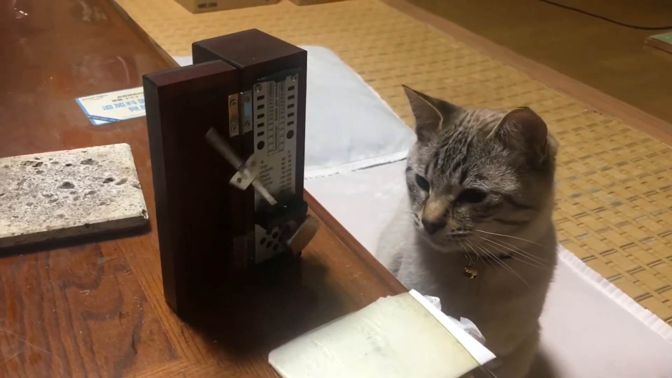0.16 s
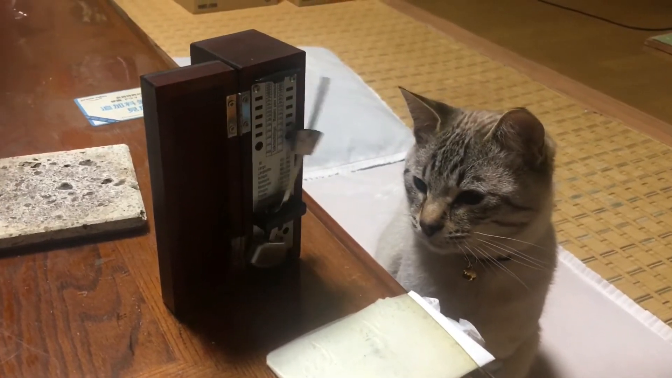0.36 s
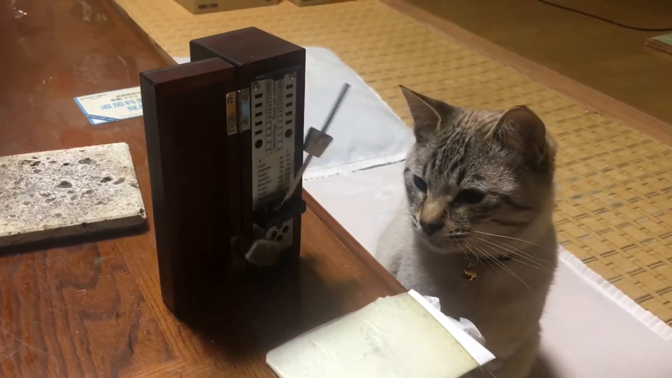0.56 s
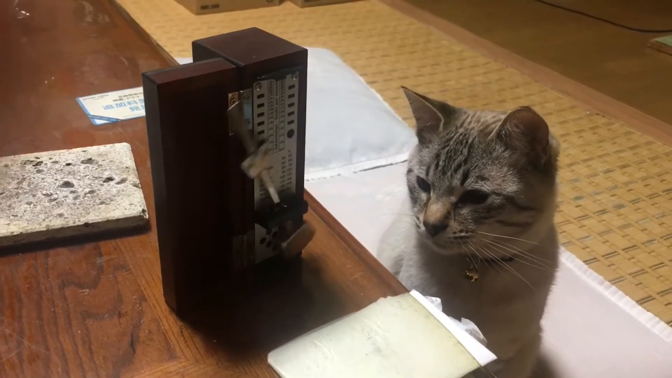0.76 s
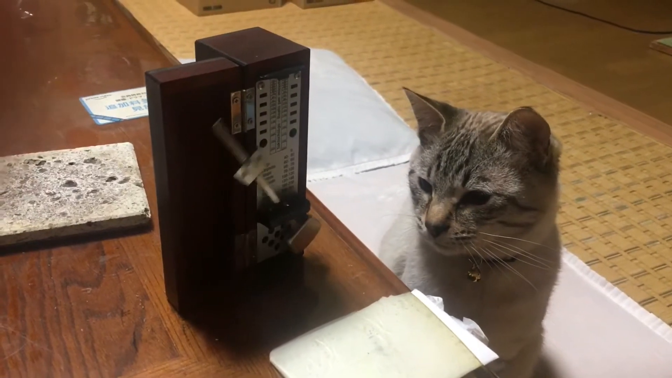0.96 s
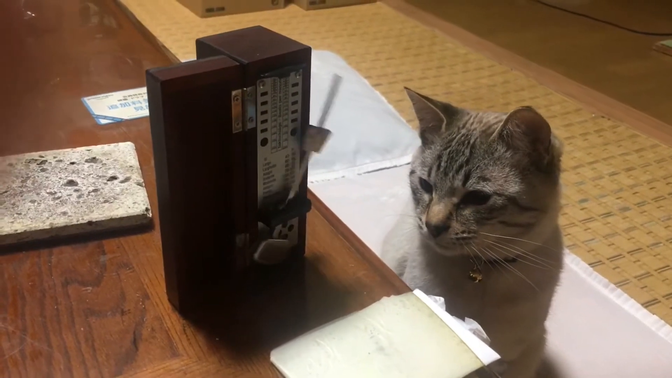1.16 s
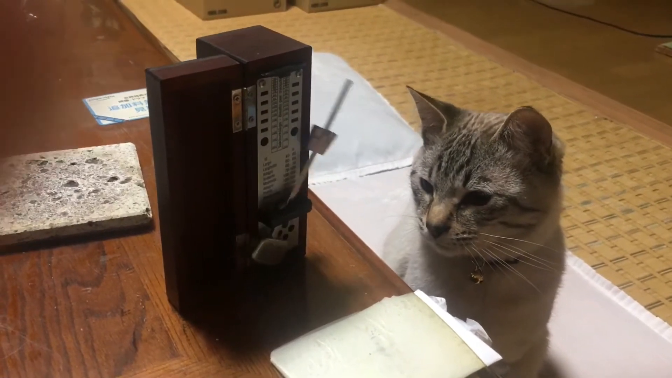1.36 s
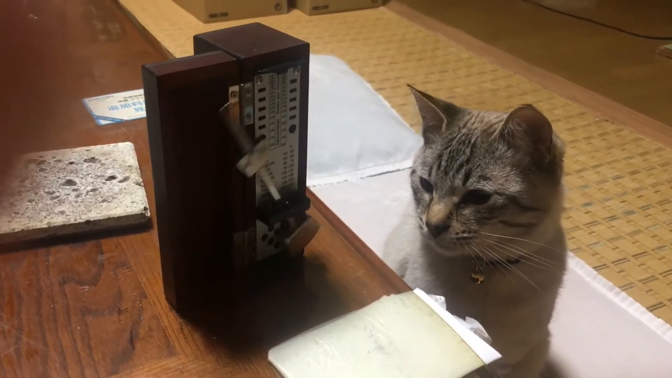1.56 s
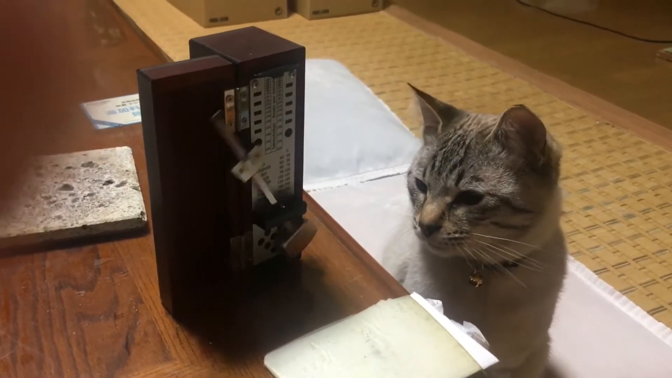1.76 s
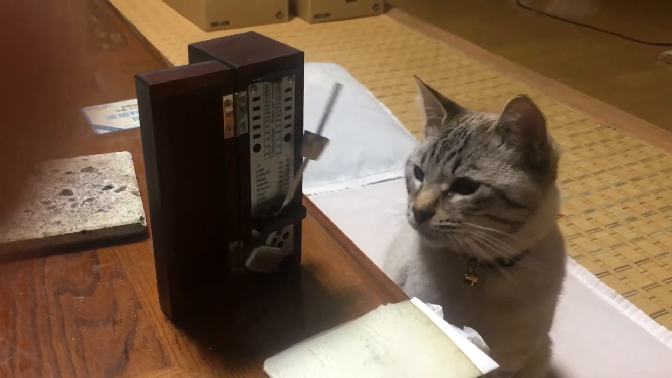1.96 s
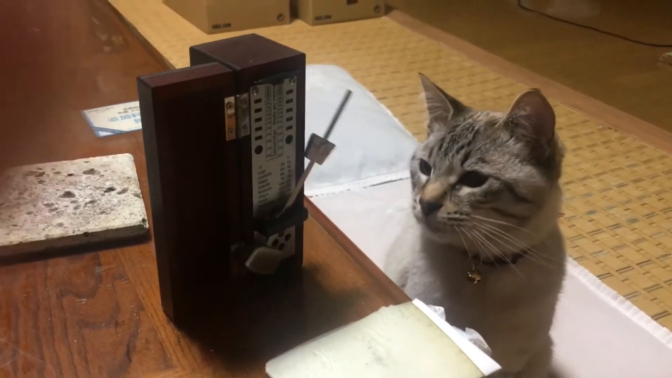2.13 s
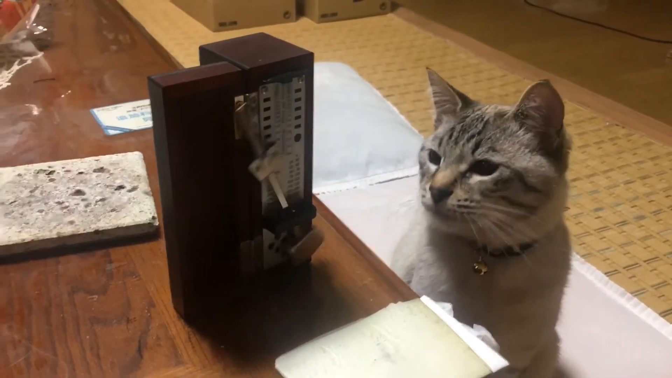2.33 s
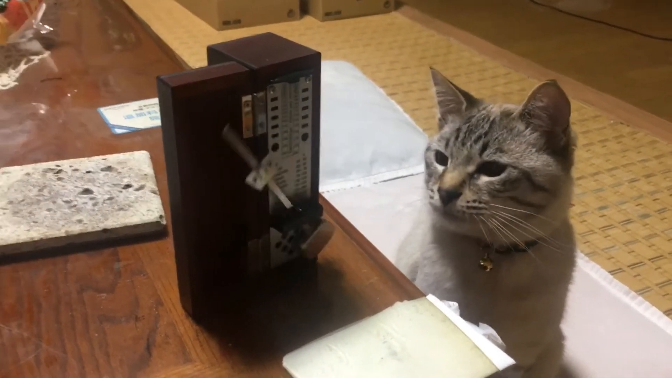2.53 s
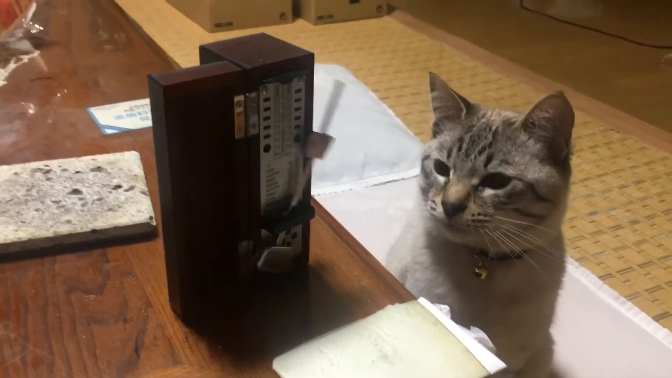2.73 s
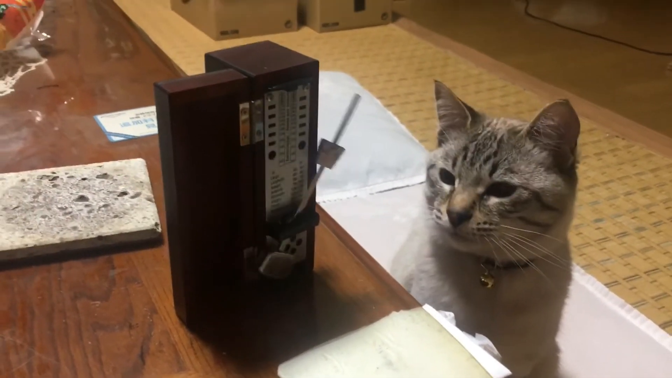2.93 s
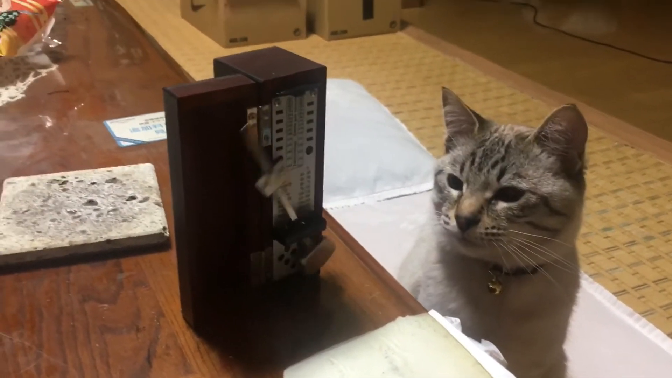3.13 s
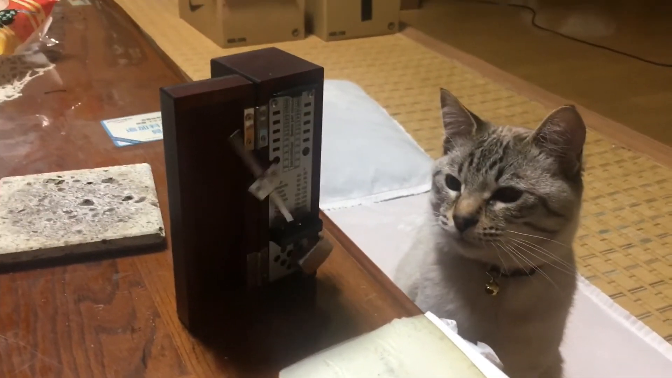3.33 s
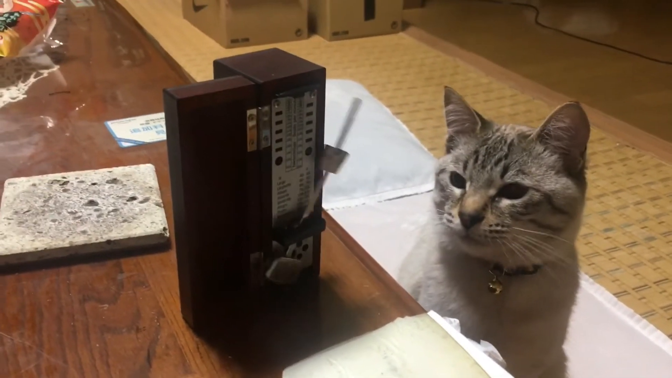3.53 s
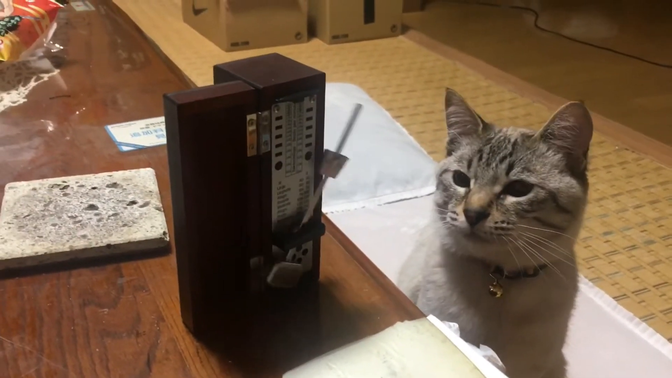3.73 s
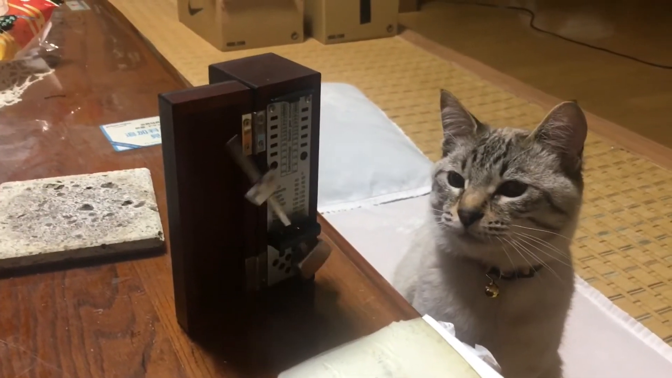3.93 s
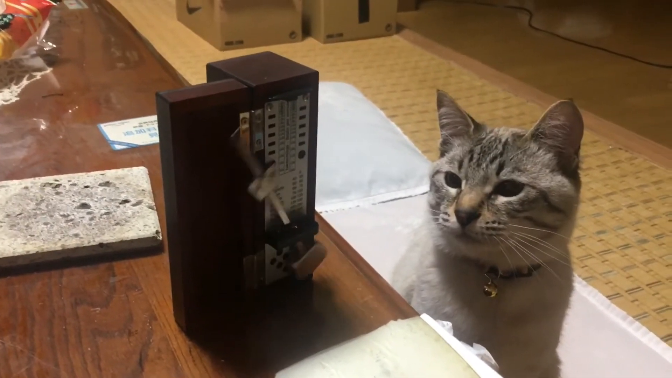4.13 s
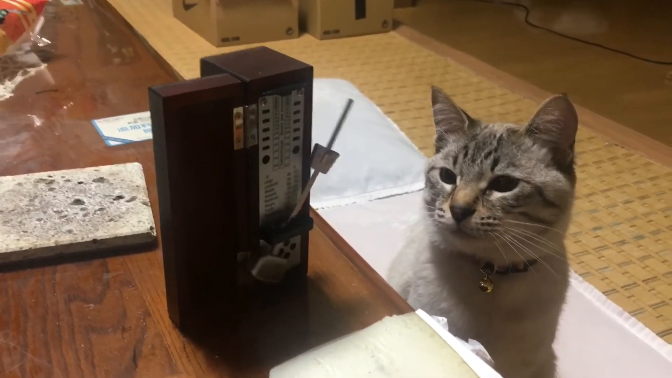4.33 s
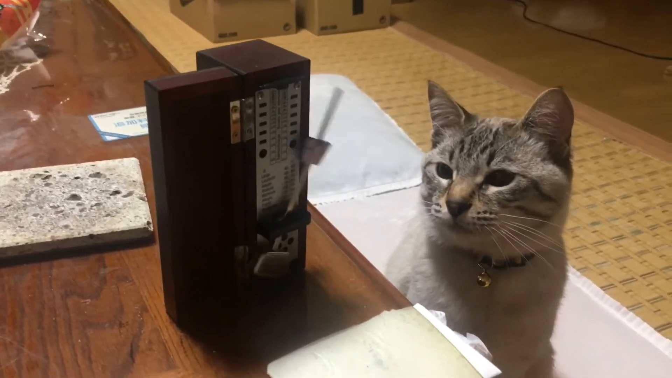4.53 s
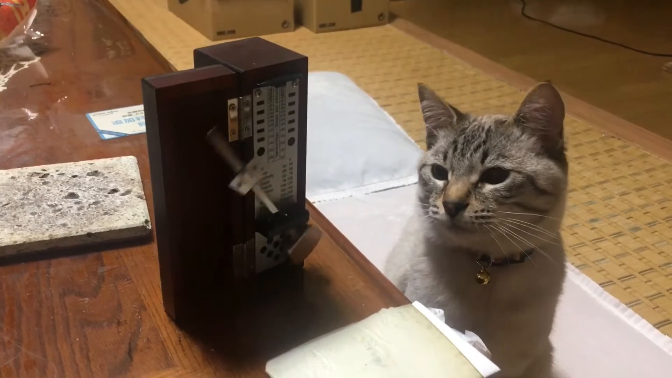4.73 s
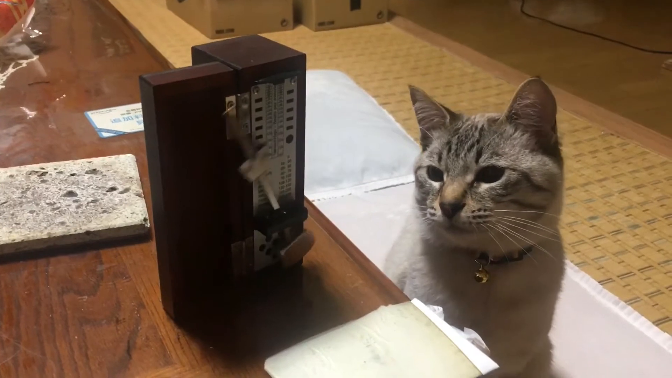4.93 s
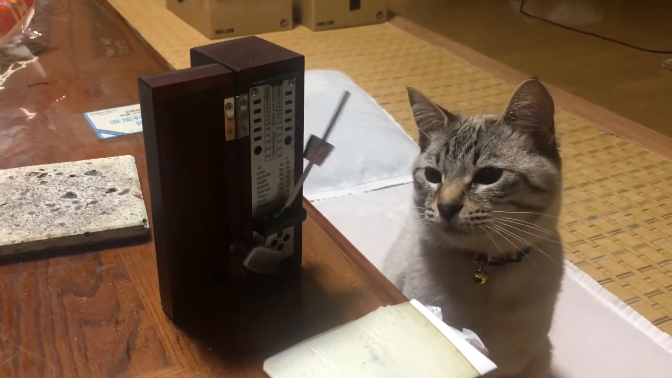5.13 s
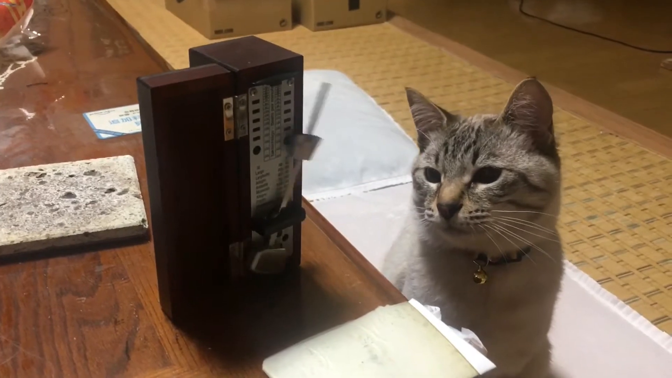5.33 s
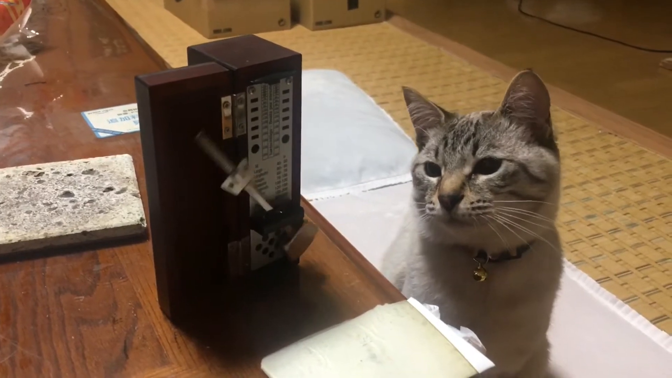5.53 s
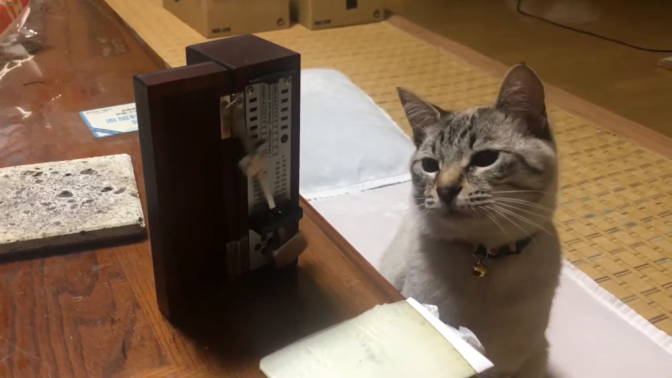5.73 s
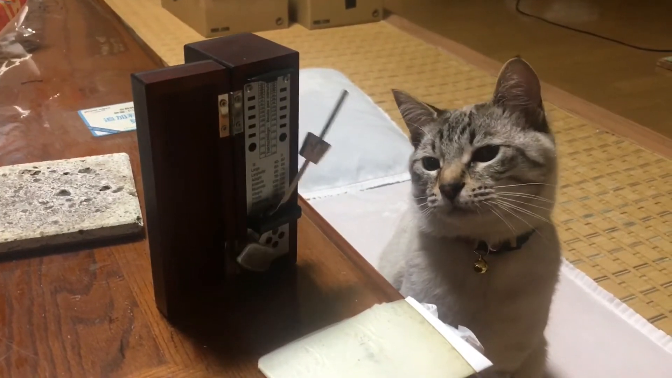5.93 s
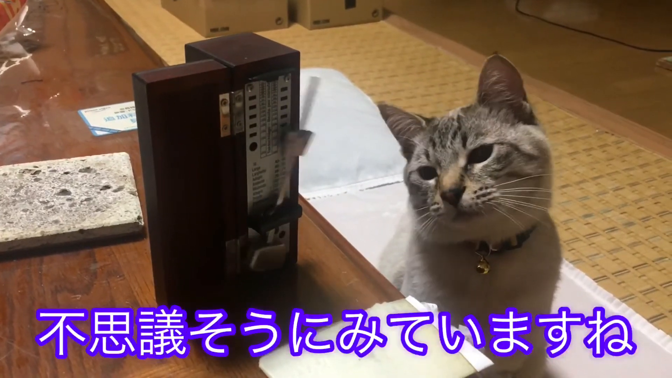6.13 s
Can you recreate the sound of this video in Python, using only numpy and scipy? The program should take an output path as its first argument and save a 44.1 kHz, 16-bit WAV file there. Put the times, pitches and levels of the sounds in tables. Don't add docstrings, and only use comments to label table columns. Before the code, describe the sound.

A wooden pendulum metronome ticks steadily about every 0.4 seconds in a quiet room, with one soft deep thump near the middle.

```python
import sys
import numpy as np
from scipy import signal
from scipy.fft import rfft, irfft, next_fast_len
from scipy.io import wavfile
from scipy.ndimage import uniform_filter1d, map_coordinates

SR = 44100
rng = np.random.default_rng(int(sys.argv[2]) if len(sys.argv) > 2 else 0)


def boost_factor(decibels):
    exponent = np.asarray(decibels, float) / 20
    return 10 ** exponent


def pcm_store(signal):
    levels = np.round(np.clip(np.atleast_2d(signal), -1, 1) * 32767)
    wavfile.write(sys.argv[1], SR, levels.astype(np.int16).T)


N = 272538

# t/s, level/dB
TICKS = [(-.085, -1.5), (.3072, 0), (.6964, -0.5), (1.0931, 0), (1.4821, 0), (1.8778, 0), (2.2682, 0),
         (2.6641, 0), (3.0557, 0.5), (3.448, 0.5), (3.8404, 0), (4.2345, -0.5), (4.627, 0.5), (5.0192, 0.5),
         (5.4133, 0), (5.8056, 0)]
# side panel level/dB, front panel level/dB, hollow level/dB, spring level/dB
TOOTH_KINDS = [
    (-8, -6, 4.5, -8),
    (-13.5, 1, 4.5, -6),
    (2.5, -7, 1.5, -12),
    (-8.5, 1, 5.5, -7),
]
# f/Hz, level/dB, t60/s, sense of motion (signed)
CASE = [(1046, -18.5, 0.0079, -0.9), (1167, -28.5, 0.067, 0.39), (1524, -7.5, 0.0067, 0.9),
        (1969, -6.5, 0.012, 0.98), (1991, -19.5, 0.033, -0.72), (2234, -8, 0.0027, -1.18),
        (2878, -17.5, 0.011, -1.04), (3150, -24, 0.014, 0.95), (3455, -9.5, 0.015, -1.06),
        (3686, -25.5, .03, 0.89), (4345, -12.5, .004, -0.89), (4624, -28.5, 0.036, -0.69),
        (5178, -23.5, 0.014, 0.78), (5133, -29, 0.024, 0.96), (6376, -21.5, 0.019, -0.81),
        (6796, -22, 0.0036, -1.1), (7960, -25.5, 0.018, -0.68)]
# f/Hz, level/dB
CRACK = [(2000, -30.5), (4500, -11.5), (6500, -15), (8500, 3), (10000, -1), (13000, -5.5), (15000, -9)]
# f/Hz, level/dB, t60/s, sense of motion (signed)
FRONT_PANEL = [(1375, -24, .018, -0.52), (1480, -16, .015, -0.48), (1540, -19, 0.022, -0.34)]
# f/Hz, level/dB, t60/s, sense of motion (signed)
REBOUND = [(1910, -16, 0.0092, 1), (4690, -23, 0.0098, 0.99), (10380, -30, 0.0034, 0.89)]
# f/Hz, level/dB, t60/s, sense of motion (signed)
SIDE_PANEL = [
    (760, -23.5, 0.078, 0.65),
    (765, -49, .25, 0.95),
]
# f/Hz, level/dB, t60/s, sense of motion (signed)
HOLLOW = [(571.6, -35, 0.026, 0.73), (620.5, -32.5, 0.055, -0.45)]
# f/Hz, level/dB, t60/s, sense of motion (signed)
ROD = [(1505, -52, 0.2, 0.18), (3234, -46.5, 0.32, 0.39), (3360, -35, 0.054, 0.69),
       (3560, -38.5, 0.22, -0.49), (3700, -65, 0.14, -0.32), (4400, -46, 0.21, 0.89),
       (5370, -48.5, 0.26, -1), (5900, -50, 0.19, 0.69), (6210, -52, .2, 0.78)]
# f/Hz, level/dB, t60/s, sense of motion (signed)
SPRING = [(1915, -47, .2, 1), (1985, -51, .16, 1)]
# f/Hz, level/dB, t60/s, sense of motion (signed)
TABLE_TOP = [(237.2, -32.5, 0.078, 0.93), (300, -36, 0.074, -1.2)]
# t/s, level/dB
BOUNCES = [(.0035, -22), (.0048, -15.5), (0.0225, -24.5)]
# t/s, level/dB
WALLS = [(.0088, 4.5), (.0118, 1), (0.0161, 4.5)]
# f/Hz, width/Hz, level/dB
PANELS = [(1076, 34, -10), (1460, 190, -9), (2020, 110, -11), (2430, 15, -17), (2865, 93, -14),
          (3427, 120, 0), (4320, 140, -9), (4600, 31, -11), (5440, 35, -13), (5650, 15, -15),
          (5940, 28, -14), (6200, 40, -15), (6920, 37, -24), (7310, 32, -25)]
# f/Hz, level/dB
SCATTER = [(410, -22), (700, -9.5), (841, -8), (1400, 4), (1950, -9.5), (2490, -21), (3460, -5.5),
           (3940, -27), (4380, -8.5), (5760, -9.5), (6320, -6.5), (7290, -26), (9110, -16.5),
           (10700, -31.5), (12500, -34), (16000, -47.5)]
# f/Hz, t60/s
NOOK = [(500, 0.01), (3000, 0.056), (10000, .04)]
# f/Hz, level/dB
DIFFUSE = [(240, -47), (400, -17), (626, -5.5), (780, -19.5), (964, -15.5), (1110, -11.5), (1500, -13),
           (1900, -16.5), (2320, -21), (2930, -17), (3470, -3), (3930, -13.5), (6340, -20), (7510, -27.5),
           (12100, -35.5), (16000, -56)]
# f/Hz, t60/s
ROOM = [(200, 0.21), (700, 0.23), (2000, 0.21), (3500, 0.26), (6000, 0.26), (10000, 0.25), (16000, 0.18)]
# t/s, how far round (0-1)
LISTENER = [
    (1.9, 0.06),
    (3.05, 0.8),
    (3.85, 0.62),
    (5.8, 0.68),
]
# f/Hz, level/dB
ROUND = [(2200, -2), (2850, -8), (3500, -4), (4100, -1.5), (5150, 10), (5900, 3.5), (7000, -6.5)]
# t/s, level/dB, f/Hz, t60/s, upper mode ratio, upper mode level/dB
THUMPS = [
    (2.513, -45, 270, 0.025, 2.6, -16),
    (2.82, -28.5, 62, 0.074, 2.1, -3),
]
# t/s, level/dB, f/Hz, t60/s, upper mode ratio, upper mode level/dB
CLICK = (.857, -49, 1900, .03, 1.15, 3)
# f/Hz, level/dB per Hz
HUM = [(18, -28), (30, -8), (81, 3), (144, -2), (199, 1), (240, -5), (284, 1.5), (347, -9.5), (524, -10.5),
       (640, -17.5), (697, -15), (781, -31.5), (900, -22), (1170, -50.5), (1980, -120)]
# t/s, half-width/s, level/dB
SWELLS = [
    (.55, 0.46, 1),
    (2.4, .55, 2),
    (4.6, 0.47, 2),
]
# f/Hz, level/dB per Hz
HISS = [(350, -27.5), (600, -10.5), (781, -8.5), (1520, -12.5), (1950, -12), (2340, -16), (2650, -13.5),
        (3740, -17.5), (4070, -13.5), (4940, -23), (5520, -20.5), (7700, -24), (12200, -24.5),
        (15400, -30.5), (16500, -38)]
# f/Hz, width/Hz, level/dB
WHINE = [(4060, 49, -79.5), (5640, 60, -85.5), (6100, 130, -86.5), (48.7, 7.4, -61), (198, 9.2, -67.5)]
# f/Hz, width/Hz, level/dB, start t/s, end t/s
PASSING = [
    (10800, 250, -85, 3.9, 4.9),
    (497, 20, -62, 5.14, 5.3),
    (497, 20, -63, 5.54, 5.74),
    (497, 20, -65, .58, .7),
]

FRONT_LATE_S = 0.0024
REBOUND_S = 0.0036
SPRING_LATE_S = 0.045
HUM_DB, HISS_DB = -54.5, -67.5
HISS_FOLLOWS = 0.41
FAN_ON_S, FAN_RISE_S, FAN_DB = 3.85, 0.081, 1.5
MIC_TOP_HZ, MIC_LOW_HZ, BAND_LIMIT_HZ = 15600, 42, 16860


def unit(x):
    return x / np.sqrt(np.mean(x ** 2) + 1e-20)


def along(points, hz):
    f, v = np.transpose(points)
    return np.interp(np.log(hz + 1), np.log(f + 1), v)


def noise(gain, n=N):
    m = next_fast_len(n + 8192)
    spectrum = rfft(rng.standard_normal(m))
    return unit(irfft(spectrum * gain(np.fft.rfftfreq(m, 1 / SR)), m)[:n])


def coloured(colour, n=N):
    return noise(lambda f: boost_factor(along(colour, f)), n)


def later(x, s):
    return np.pad(x, (round(abs(s) * SR), 0))[:len(x)]


def echoes(x, taps):
    return sum(boost_factor(db) * later(x, s) for s, db in taps)


def add(out, x, s):
    out[round((s + 1) * SR):][:len(x)] += x


def ring(modes, t, scatter_db=0.0, attack=0.00039):
    out = 0
    for hz, db, t60, sense in modes:
        level = boost_factor(db + scatter_db * rng.standard_normal() - 60 * t / t60)
        out = out + sense * level * np.sin(2 * np.pi * hz * t)
    return out * (1 - np.exp(-t / attack))


def metronome():
    out, t = np.zeros(N + 2 * SR), np.arange(SR // 3) / SR
    places = [room_answer(t), room_answer(t)]
    tooth = coloured(CRACK, len(t))
    for k, (s, db) in enumerate(TICKS):
        moved = np.interp(s, *np.transpose(LISTENER))
        side_db, front_db, hollow_db, spring_db = TOOTH_KINDS[k % len(TOOTH_KINDS)]
        blow = escapement_blow(t, tooth, moved, front_db)
        low = low_body(t, hollow_db)
        side = boost_factor(side_db) * ring(SIDE_PANEL, t, attack=0.012)
        near = echoes(blow, BOUNCES)
        steel = rod_and_spring(t, spring_db)
        turn = 0.17 * s
        room = np.cos(turn) * places[0] + np.sin(turn) * places[1] + 0.35 * room_answer(t)
        add(out, boost_factor(db) * (blow + low + side + near + room + steel), s)
        slip = ring(CASE, t, scatter_db=3, attack=0.002)
        add(out, boost_factor(db - 48) * slip, s - 0.021)
    return out[SR:SR + N]


def escapement_blow(t, tooth, moved, front_db):
    heard = [(hz, db + (moved - 0.25) * along(ROUND, hz), t60, sense) for hz, db, t60, sense in CASE]
    case = ring(heard, t, scatter_db=1.1)
    front = later(ring(FRONT_PANEL, t, scatter_db=-0.9, attack=0.0014), FRONT_LATE_S)
    crack_level = boost_factor(-29.0 + 0.9 * moved - 60 * t / 0.01)
    crack = crack_level * (tooth + 0.5 * coloured(CRACK, len(t)))
    rebound = later(ring(REBOUND, t, scatter_db=1.6, attack=0.0007), REBOUND_S)
    return case + boost_factor(front_db) * front + crack + boost_factor(0.3 * front_db) * rebound


def low_body(t, hollow_db):
    hollow = boost_factor(hollow_db) * ring(HOLLOW, t, scatter_db=-0.66, attack=0.001)
    table = later(ring(TABLE_TOP, t, scatter_db=1.0, attack=0.0059), 0.00614)
    return hollow + echoes(hollow, WALLS) + table


def rod_and_spring(t, spring_db):
    rod = ring(ROD, t, scatter_db=1.5, attack=0.0017)
    spring = ring(SPRING, t, scatter_db=1.5, attack=0.012)
    return rod + boost_factor(spring_db) * later(spring, SPRING_LATE_S)


def room_answer(t):
    diffuse = tail(DIFFUSE, ROOM, t, start=0.006, rise=0.004, between=0.45)
    scatter = tail(SCATTER, NOOK, t, start=0.003, rise=0.0005, between=0.5)
    return boost_factor(-8.5) * diffuse + boost_factor(-2.5) * scatter


def tail(colour, t60, t, start, rise, between):
    def gain(f):
        peaks = [1 / (1 + (2 * (f - centre) / width) ** 2) for centre, width, _ in PANELS]
        return boost_factor(along(colour, f)) * np.maximum(between, np.max(peaks, axis=0))

    hz, u, z = signal.stft(noise(gain, len(t)), SR, nperseg=128)
    decay = boost_factor(-60 * u / along(t60, hz)[:, None])
    x = signal.istft(z * decay, SR, nperseg=128)[1][:len(t)]
    x = x * (1 - np.exp(-t / rise))
    return later(x / np.linalg.norm(x), start)


def knocks():
    out, t = np.zeros(N + 2 * SR), np.arange(SR // 4) / SR
    for s, db, hz, t60, ratio, upper_db in [CLICK, *THUMPS]:
        modes = [(hz, db, t60, -1), (ratio * hz, db + upper_db, 0.48 * t60, -1)]
        add(out, ring(modes, t, attack=0.0024), s)
    return out[SR:SR + N]


def air():
    t = np.arange(N) / SR
    swell_db = sum(db * np.exp(-((t - s) / w) ** 2) for s, w, db in SWELLS)
    hum_db = HUM_DB + swell_db + 0.89 * wobble(6) + 1.3 * wobble(25)
    hum = boost_factor(hum_db) * coloured(HUM)
    fan_db = FAN_DB * np.clip((t - FAN_ON_S) / FAN_RISE_S, 0, 1)
    hiss_db = HISS_DB + HISS_FOLLOWS * swell_db + fan_db + 0.51 * wobble(3.5)
    hiss = boost_factor(hiss_db) * patchy(coloured(HISS), depth_db=2.0)
    out = hum + hiss + sum(appliance_band(*row) for row in WHINE)
    for hz, width, db, start, end in PASSING:
        fade = np.clip(np.minimum(t - start, end - t) / 0.024, 0, 1)
        out = out + fade * appliance_band(hz, width, db)
    return out


def appliance_band(hz, width, db):
    return boost_factor(db + 0.8 * wobble(5)) * noise(lambda f: np.exp(-((f - hz) / width) ** 2))


def wobble(rate):
    knots = rng.standard_normal(int(N * rate / SR) + 4)
    return map_coordinates(knots, [np.arange(N) * rate / SR])


def patchy(x, depth_db):
    z = signal.stft(x, nperseg=1024)[2]
    field = uniform_filter1d(rng.standard_normal(z.shape), 5, 0)
    field = uniform_filter1d(field, 16, 1)
    return unit(signal.istft(z * boost_factor(depth_db * unit(field)), nperseg=1024)[1][:N])


def scene():
    return (metronome() + knocks() + air())[None]


def band_limit(x):
    return signal.sosfilt(signal.butter(12, 16860, fs=SR, output="sos"), x)


def record(dry):
    x = signal.sosfilt(signal.butter(12, MIC_TOP_HZ, fs=SR, output="sos"), dry)
    x = signal.sosfilt(signal.butter(3, MIC_LOW_HZ, "high", fs=SR, output="sos"), x)
    mix = irfft(rfft(x) * (np.fft.rfftfreq(N, 1 / SR) < BAND_LIMIT_HZ), N)
    return band_limit(mix)


dry = scene()
out = record(dry)
pcm_store(out)
```